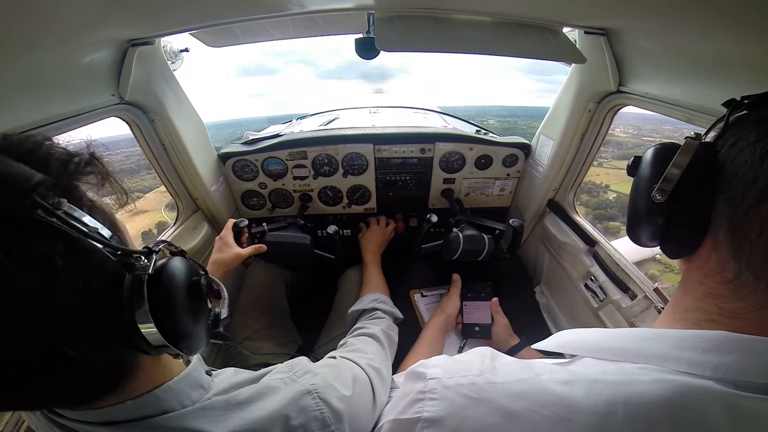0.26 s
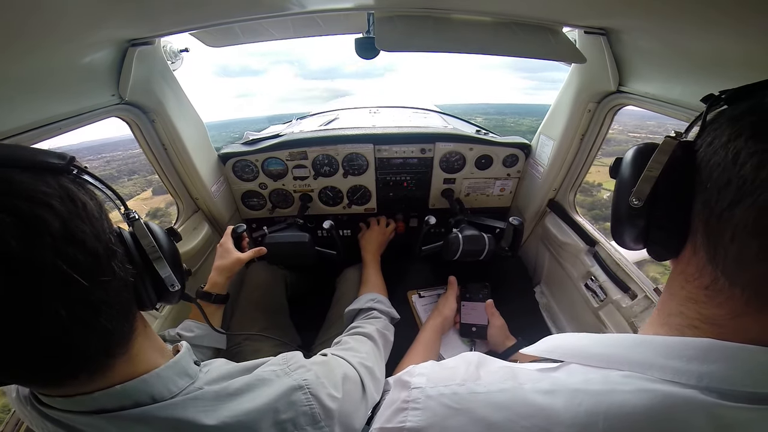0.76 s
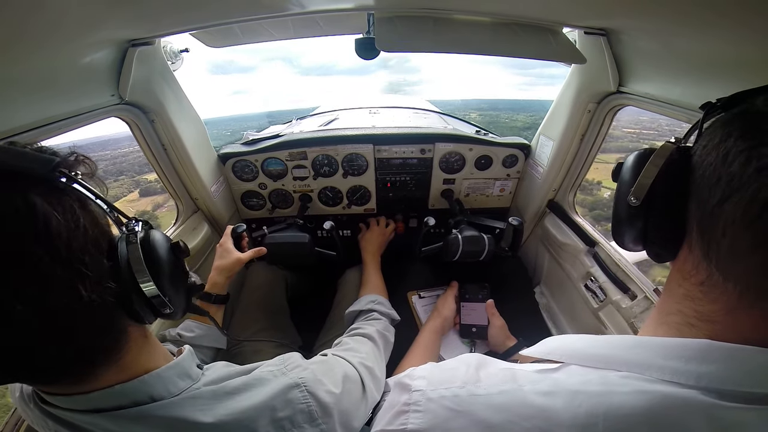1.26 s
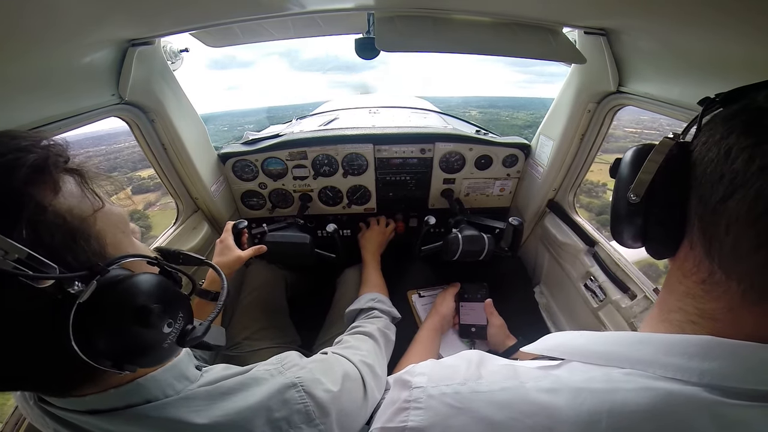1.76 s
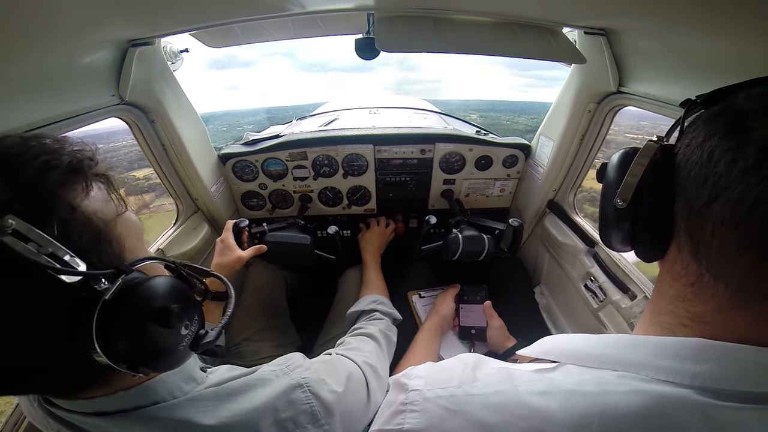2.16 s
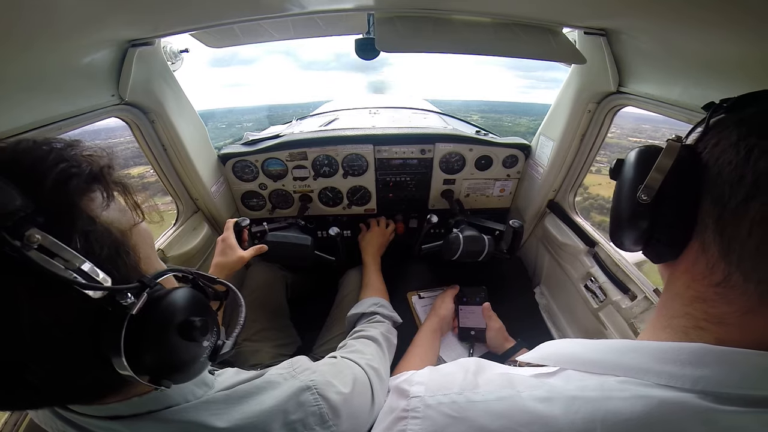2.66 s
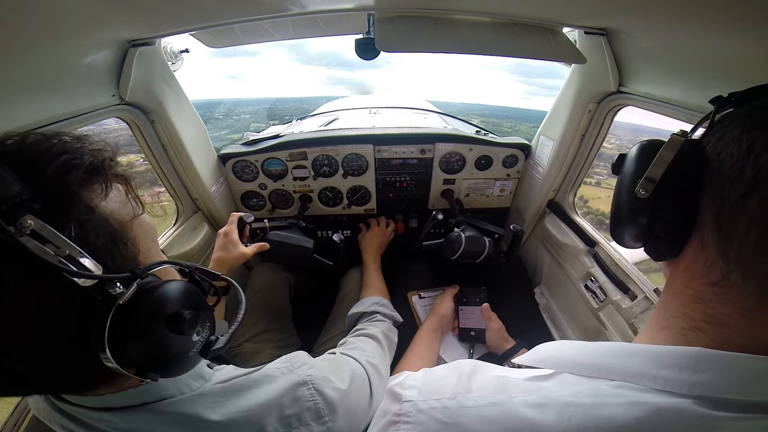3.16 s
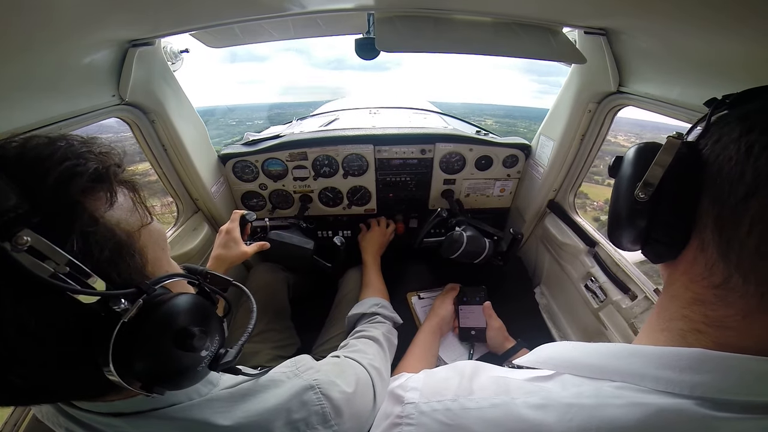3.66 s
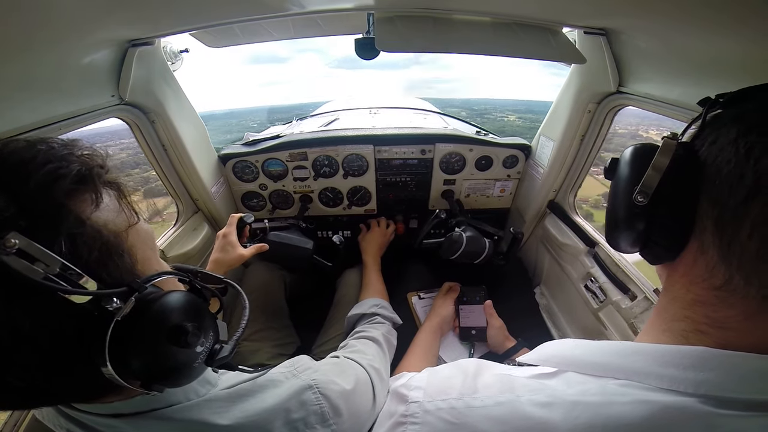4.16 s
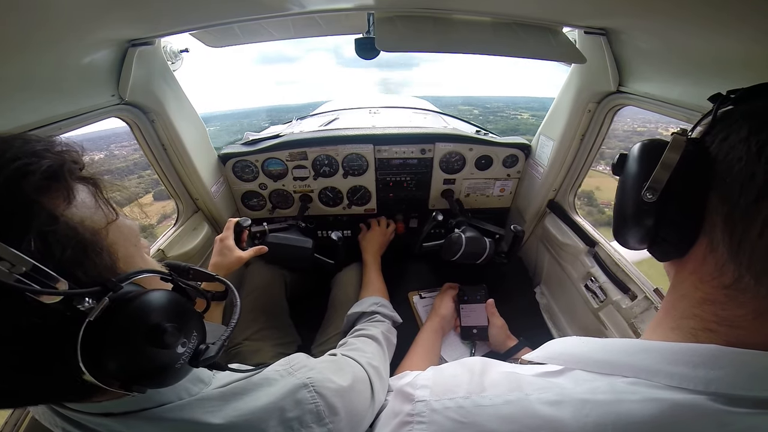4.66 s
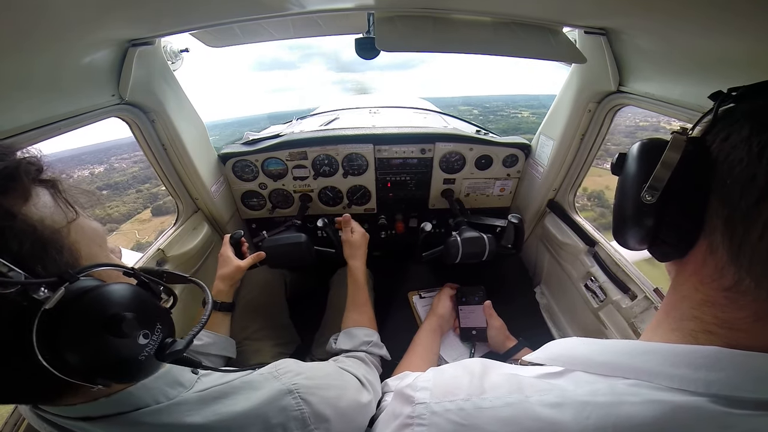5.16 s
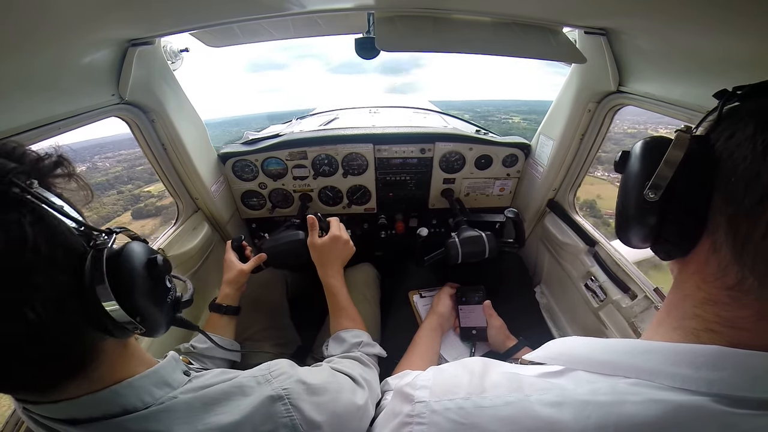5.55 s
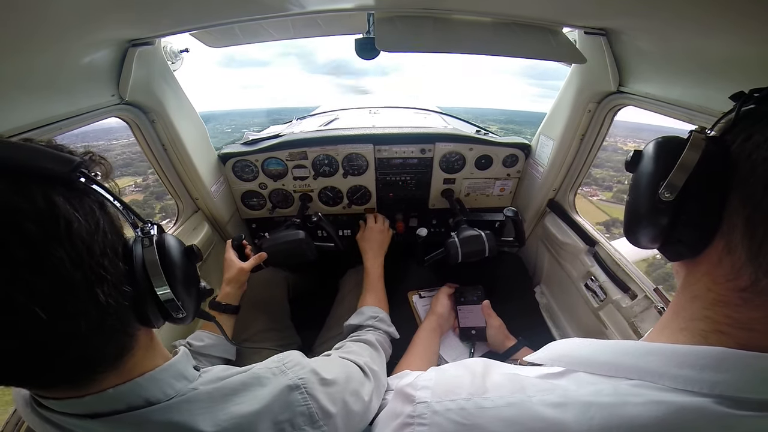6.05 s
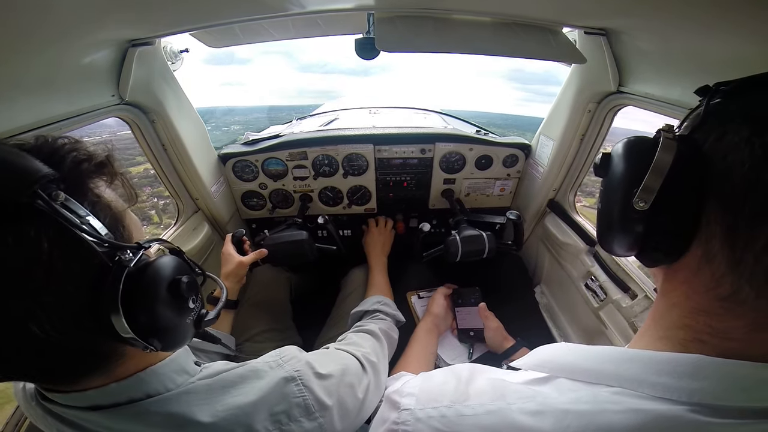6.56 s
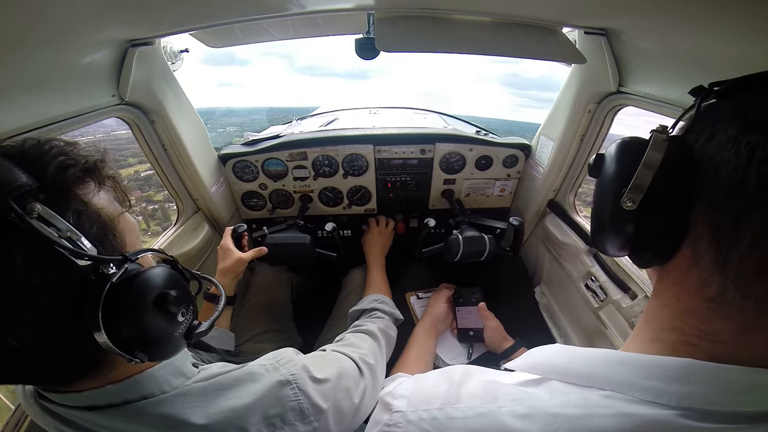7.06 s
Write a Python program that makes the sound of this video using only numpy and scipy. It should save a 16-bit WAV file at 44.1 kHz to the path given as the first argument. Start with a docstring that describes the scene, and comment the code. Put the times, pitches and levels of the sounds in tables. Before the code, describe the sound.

Inside the small cabin of a light plane in cruise, a piston engine and propeller drone without a break at a very low pitch, near 79 Hz and almost constant. At 0 s the boom is very strong, then falls away within about 0.1 s and returns by 0.5 s. From there the bass and its overtones swell and sag independently, giving a wavering, slightly rough throb, with a fuller bass surge near 2.7 s. Steady broadband air rush and low rumble lie around it, gently fluctuating. The bass thins from about 4.5 s; a faint, breathy high whistle near 6 kHz is strongest around 4.8 s. The boom stays uneven through 5.8 s, strengthens after 6.2 s, and peaks again from about 7.1 s to the abrupt end at 7.3 s, with faint, dry ticks of loose trim. Close, enclosed, slightly saturated sound.

```python
"""Inside the cabin of a light aircraft in cruise: a four-cylinder engine and two-blade propeller drone.
The boom opens strong and drops at once; then it and three overtones of the firing rate swell separately,
as sums of sines, over weaker tones of uneven cylinders. Shaped noise makes the slipstream's steady rush,
rumble and gap whistle, the whistle strongest near 4.8 s. In the last fifth of a second the boom
peaks again and loose trim ticks faintly, each tick a sum of short decaying modes."""
import sys
import numpy as np
from scipy import signal
from scipy.fft import rfft, irfft, next_fast_len
from scipy.io import wavfile
from scipy.ndimage import uniform_filter1d

SR = 44100
rng = np.random.default_rng(int(sys.argv[2]) if len(sys.argv) > 2 else 0)


def bounce(signal):
    """Save signal as a 16-bit WAV file at the path given by the first command-line argument."""
    frames = np.transpose(np.atleast_2d(signal))
    limited = np.clip(frames, -1, 1)
    pcm = np.round(limited * 32767).astype(np.int16)
    wavfile.write(sys.argv[1], SR, pcm)


N = 322371

# Engine speed, which sets every pitch of the drone. Each row: time in seconds, firing rate in Hz.
FIRING_RATE = [(0, 78.96), (1.0, 79.22), (2.0, 79.22), (3.7, 79.5), (5.4, 79.16), (6.6, 79.63),
               (7.31, 79.53)]
# Swells of the firing rate and its next three multiples. Each row: time in seconds, mean level in dB rms.
BOOM_SWELL = [(0.0, -7), (0.12, -27.5), (0.55, -12.5), (0.82, -11), (0.94, -18), (1.12, -13), (1.41, -11.5),
              (1.72, -13.5), (1.95, -12.0), (2.52, -13.0), (2.68, -8.5), (3.06, -17), (3.36, -10.5),
              (3.96, -13), (4.06, -10.5), (4.24, -11.5), (4.5, -18.5), (4.8, -22), (5.01, -15),
              (5.46, -14.5), (5.56, -21), (5.68, -14.5), (5.82, -18.5), (6.24, -12), (6.76, -11.5),
              (6.94, -15.5), (7.14, -8.5), (7.3, -8)]
SECOND_SWELL = [(0.0, -27), (0.22, -19), (0.55, -18.0), (0.76, -27), (0.94, -26.5), (1.17, -35),
                (2.38, -21.5), (2.88, -28.5), (3.1, -23.5), (3.24, -22.0), (3.6, -33), (3.78, -25.0),
                (4.62, -21.5), (4.74, -19), (4.86, -16.5), (4.99, -34), (5.2, -19.5), (5.76, -25),
                (5.94, -33.5), (6.96, -20), (7.2, -34.5), (7.3, -24)]
THIRD_SWELL = [(0.0, -22), (0.34, -18.5), (0.7, -30.5), (1.17, -25.5), (1.26, -32.5), (1.98, -21.5),
               (2.74, -25.5), (2.94, -21), (3.72, -22), (3.96, -30), (4.24, -21), (4.44, -27.5),
               (5.68, -21.5), (6.34, -28.0), (6.46, -21.5), (6.82, -25), (7.18, -27.5), (7.3, -43)]
FOURTH_SWELL = [(0.0, -37), (0.24, -25), (0.7, -34.5), (0.88, -28.5), (1.08, -36), (1.5, -29.5),
                (1.86, -26.5), (2.01, -33.5), (3.4, -27), (3.66, -37), (3.82, -29), (4.89, -28.0),
                (5.88, -35.5), (6.0, -29.5), (7.02, -34.0), (7.3, -42)]
# Uneven cylinders and higher overtones. Each row: multiple of the firing rate, mean level in dB rms.
WEAK_ORDERS = [(.25, -36), (.5, -38.5), (.75, -48), (1.25, -26.5), (1.5, -55), (1.75, -39.5), (2.25, -36.5),
               (2.5, -57), (2.75, -40), (3.25, -37.5), (3.75, -43.5), (4.25, -41.5), (4.75, -44),
               (5, -43.5), (6, -47.5), (7, -50.5), (8, -47.5), (9, -49), (10, -53), (12, -50.5),
               (13, -49.5), (13.25, -49), (14, -53)]
# Modes of the tapped trim. Each row: frequency in Hz, relative level in dB, 60 dB decay time in seconds.
TRIM_MODES = [(5200, -4, .008), (7700, 0, .008), (8500, 0, .008), (11400, 7, .006), (12800, 5, .005)]
# Loudness of the rush; its swing also moves the rumble and the weak tones.
# Each row: time in seconds, level in dB rms.
RUSH_LEVEL = [(0.0, -29.0), (0.22, -28.5), (0.42, -28), (0.6, -32.0), (0.96, -32), (1.78, -29.0),
              (2.4, -30.5), (3.66, -30), (3.9, -31.5), (5.16, -28.5), (5.28, -30.0), (5.88, -31),
              (6.1, -29.0), (6.24, -30.0), (7.18, -31), (7.3, -33)]
# Strength of the gap whistle. Each row: time in seconds, level in dB rms.
WHISTLE_LEVEL = [(0.0, -47), (0.42, -47), (0.64, -53), (2.04, -48.0), (2.32, -50.5), (3.18, -47.0),
                 (3.36, -52), (4.08, -51), (4.44, -46), (4.66, -50), (4.77, -43.5), (5.86, -53),
                 (6.16, -48), (7.3, -51)]
# Spectra of the three air noises. Each row: frequency in Hz, relative density in dB per Hz.
RUSH_SPECTRUM = [(300, -4.5), (430, -5), (600, -5), (900, -6), (1300, -6), (1850, -6), (2800, -9),
                 (4400, -14.5), (5200, -22.5), (6300, -17.5), (8300, -31.5), (9800, -35), (11700, -37.5),
                 (15300, -52.5)]
WHISTLE_SPECTRUM = [(5500, -20), (5740, -8), (5880, 3.5), (5990, -1), (6120, -14), (6300, -27)]
RUMBLE_SPECTRUM = [(14, -25), (30, -21), (50, -21), (64, -20.5), (74, -1.5), (88, -6), (108, -6.5),
                   (130, -11), (190, -10.5), (230, -10), (280, -10.5), (310, -10), (345, -20.5), (520, -38)]
# Resonances (+) and cancellations (-) of cabin and housing.
# Each row: centre in Hz, width in Hz (two standard deviations), height in dB.
CABIN_RESONANCES = [(686, 65, 5.5), (856, 110, -2.5), (1032, 29, 0), (1570, 74, 5.5), (1596, 30, -5),
                    (1910, 39, 5.5), (2010, 168, -8.5), (2220, 150, -3.5), (2416, 140, 4),
                    (3600, 110, -2.5), (4094, 185, -4.5), (6560, 60, -1), (11000, 200, 1), (13800, 900, 1)]

# quick chance wavering of the four strong overtones: spread in dB, levels per second; phase sway in radians
FLUTTER_DB, FLUTTER_PER_S = (1.97, 1.75, 1.1, 2.6), 12
PHASE_SWAY_RAD = (0.39, 0.24, 0.15, 0.33)
# slower wavering of the whistle and of the weak tones
WHISTLE_WAVER_DB, HIGH_WAVER_DB, WAVER_PER_S = 1.5, 2, 6
# boom level where trim starts to tick, tick level there, its growth per dB of boom, its spread
RATTLE_FROM_DB, TICK_DB, TICK_DB_PER_DB, TICK_SCATTER_DB = -8.5, -40, 5, 4
TICK_BRIGHT_DB, BRIGHT_SCATTER_DB = -18, 3.5  # added to the modes above 10 kHz
TICK_SAMPLES = 800
TOP_HZ = 14950  # upper edge of the recorded band


def undb(db):
    """Level as amplitude ratio: 20 dB is a factor of ten."""
    return 10 ** (np.asarray(db) / 20)


def walk(rate):
    """Band-limited chance: random levels held 1 / rate s and averaged twice; spread near 1."""
    hold = int(SR / rate)
    steps = np.repeat(rng.standard_normal(N // hold + 1), hold)
    return 1.13 * uniform_filter1d(uniform_filter1d(steps, hold), hold)[:N]


def curve(table):
    """Linear interpolation: the second column of a table at every sample."""
    seconds, values = np.transpose(table)
    return np.interp(np.arange(N) / SR, seconds, values)


def tone(firings, order, db, sway_rad, rate):
    """Phase modulation: gusty air on the blades sways the phase of one multiple of the firing rate."""
    phase = 2 * np.pi * (order * firings + rng.random()) + sway_rad * walk(rate)
    return np.sqrt(2) * undb(db) * np.sin(phase)


def engine(firings, swells_db, swing_db):
    """Harmonic series: firing and blade passes share one fundamental; uneven cylinders add fractions."""
    out = np.zeros(N)
    for k, (swell_db, flutter_db, sway_rad) in enumerate(zip(swells_db, FLUTTER_DB, PHASE_SWAY_RAD)):
        db = swell_db + flutter_db * walk(FLUTTER_PER_S)
        out += tone(firings, k + 1, db, sway_rad, 5)
    shared_waver_db = HIGH_WAVER_DB * walk(WAVER_PER_S)
    for order, mean_db in WEAK_ORDERS:
        blur = min(order / 6, 1)  # the higher the tone, the more it blurs and breaks up
        own_waver_db = (1.07 + 3.2 * blur) * walk(14)
        db = mean_db + 1.4 * swing_db + blur * shared_waver_db + own_waver_db
        out += tone(firings, order, db, 0.32 + 2.12 * blur, 13)
    return out


def tick(hardness, brightness, detuning):
    """Modal decay: a soft tap rings a few short, high modes, each dying exponentially."""
    t = np.arange(TICK_SAMPLES) / SR
    bright_db = TICK_BRIGHT_DB + BRIGHT_SCATTER_DB * brightness
    ring = np.zeros(TICK_SAMPLES)
    for (hz, db, t60), detune in zip(TRIM_MODES, detuning):
        gain = undb(db + bright_db * (hz > 1e4))
        ring += gain * np.sin(2 * np.pi * hz * (1 + 0.027 * detune) * t) * 1000. ** (-t / t60)
    soft_onset = 1 - np.exp(-t / .0004)
    return undb(TICK_SCATTER_DB * hardness) * ring * soft_onset


def trim(firings, boom_db):
    """Threshold rattle: loose trim ticks once a firing above a boom level, harder as the boom grows."""
    out = np.zeros(N + TICK_SAMPLES)
    for at in np.flatnonzero(np.diff(np.floor(firings))):
        over_db = boom_db[at] - RATTLE_FROM_DB
        if over_db < 0:
            continue
        hardness, brightness, *detuning = rng.standard_normal(2 + len(TRIM_MODES))
        gain = undb(TICK_DB + TICK_DB_PER_DB * over_db)
        out[at:at + TICK_SAMPLES] += gain * tick(hardness, brightness, detuning)
    return out[:N]


def gusty_noise(shape, resonances, flicker, rate, width, ripple_db=0):
    """Filtered noise: a given spectrum, rms 1, in overlapping bands that flicker alone.

    flicker scales each band's spread in dB; width is the band spacing in octaves.
    """
    size = next_fast_len(N)
    hz = np.maximum(np.arange(size // 2 + 1) * SR / size, 1.)
    corner_hz, corner_db = np.transpose(shape)
    db = np.interp(np.log(hz), np.log(corner_hz), corner_db, left=-90, right=-90)
    for centre, wide, lift_db in resonances:
        db = db + lift_db * np.exp(-.5 * (2 * (hz - centre) / wide) ** 2)
    # a fine random ripple, one height every 45 Hz, gives the treble a slightly tonal grain
    ripple = np.interp(hz / 45, np.arange(600), rng.standard_normal(600))
    db = db + ripple_db * np.clip(hz / 2500 - 1, 0, 1) * ripple
    spectrum = rfft(rng.standard_normal(size)) * undb(db)
    place = np.log2(hz / corner_hz[0]) / width
    out = np.zeros(N)
    for k in range(int(np.log2(corner_hz[-1] / corner_hz[0]) / width) + 2):
        crossfade = np.clip(1 - abs(place - k), 0, 1)
        band = irfft(spectrum * crossfade, size)[:N]
        out += band * undb(flicker * (1.5 + 0.047 * k) * walk(rate))  # higher bands flicker more
    return out / np.std(out)


def slipstream(firings, rush_db, swing_db, whistle_db):
    """Flow noise: turbulence drums the skin, rushes and whistles at a gap; the blades modulate the treble."""
    # throb at the firing rate, its double and its half
    beat = np.cos(2 * np.pi * firings) + 0.87 * np.cos(4 * np.pi * firings) + .6 * np.cos(np.pi * firings)
    rush = gusty_noise(RUSH_SPECTRUM, CABIN_RESONANCES, flicker=0.27, rate=8, width=0.39, ripple_db=2.5)
    rush = rush * (1 + 0.045 * beat) * undb(rush_db + 0.36 * walk(9.9))
    whistle = gusty_noise(WHISTLE_SPECTRUM, [], flicker=2.0, rate=8.7, width=.3)
    whistle = whistle * (1 + 0.13 * beat) * undb(whistle_db + WHISTLE_WAVER_DB * walk(WAVER_PER_S))
    rumble = gusty_noise(RUMBLE_SPECTRUM, [], flicker=1.0, rate=2.68, width=0.67)
    rumble = rumble * undb(-21.0 + 0.96 * swing_db)
    return rush + whistle + rumble


def scene():
    """Superposition: the pressures of engine, trim and slipstream add at one microphone."""
    firings = np.cumsum(curve(FIRING_RATE)) / SR  # firings elapsed
    swells_db = [curve(table) for table in (BOOM_SWELL, SECOND_SWELL, THIRD_SWELL, FOURTH_SWELL)]
    rush_db = curve(RUSH_LEVEL)
    swing_db = rush_db - np.mean(rush_db)  # level swing shared by rush, rumble and weak tones
    drone = engine(firings, swells_db, swing_db)
    ticks = trim(firings, swells_db[0])
    air = slipstream(firings, rush_db, swing_db, curve(WHISTLE_LEVEL))
    return (drone + ticks + air)[None]


def record(dry):
    """Saturation and band limit: a tanh curve rounds the loudest peaks, a low-pass cuts the top."""
    rounded = np.tanh(0.72 * dry) / 0.67
    low_pass = signal.ellip(8, .2, 70, TOP_HZ, fs=SR, output="sos")
    return signal.sosfilt(low_pass, rounded)


dry = scene()
out = record(dry)
bounce(out)
```